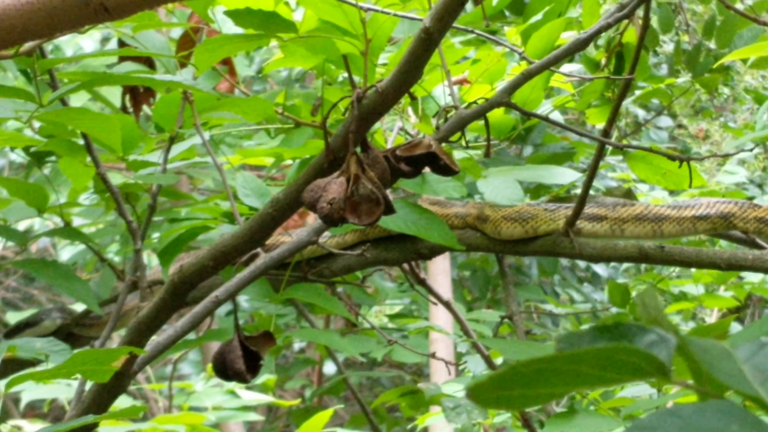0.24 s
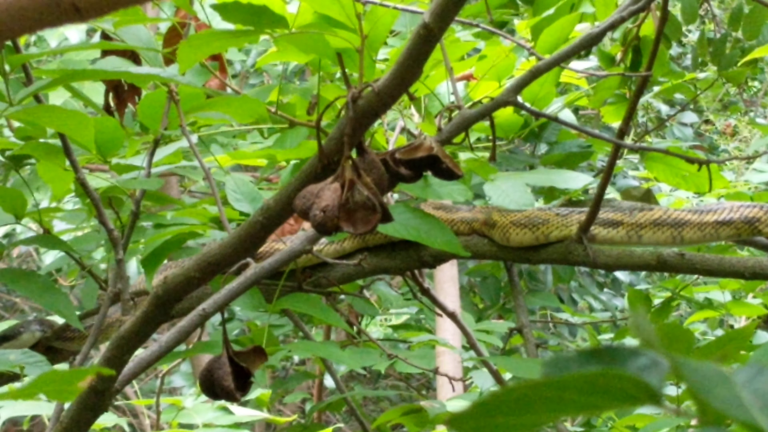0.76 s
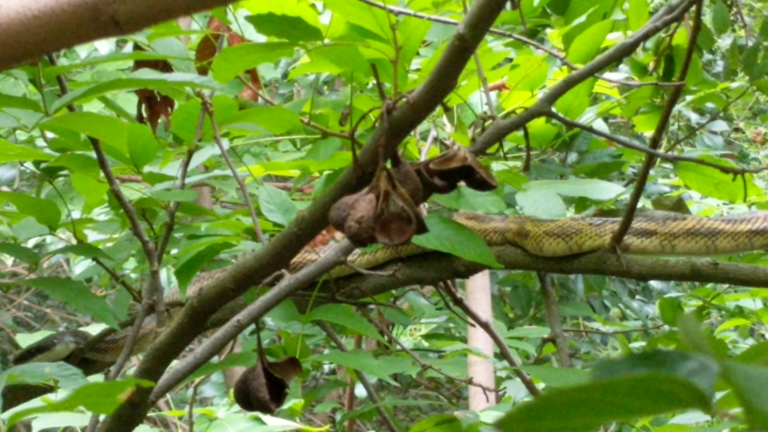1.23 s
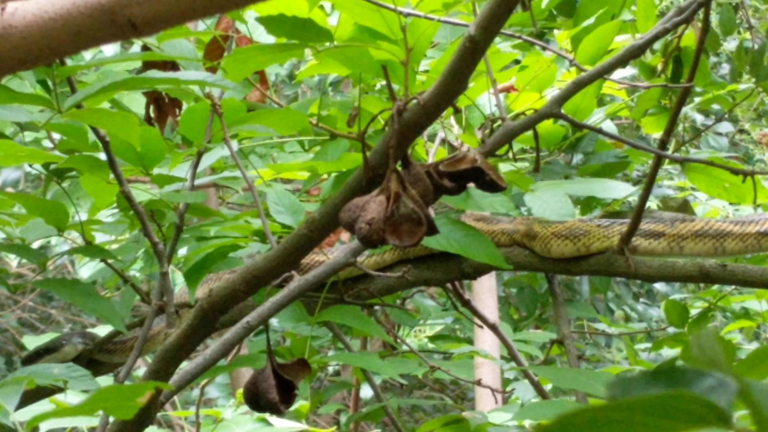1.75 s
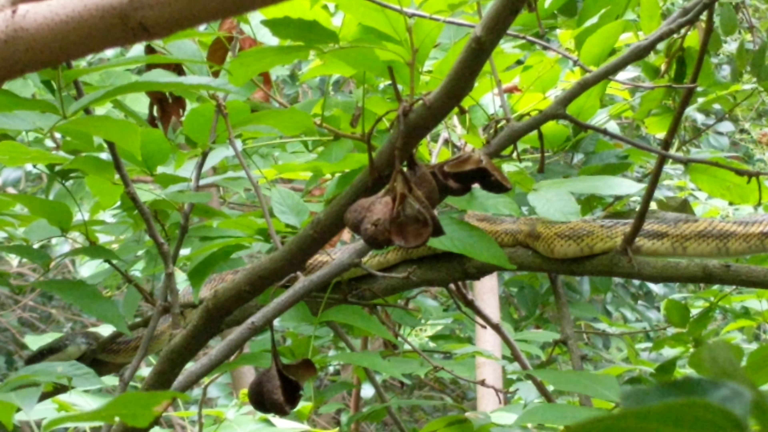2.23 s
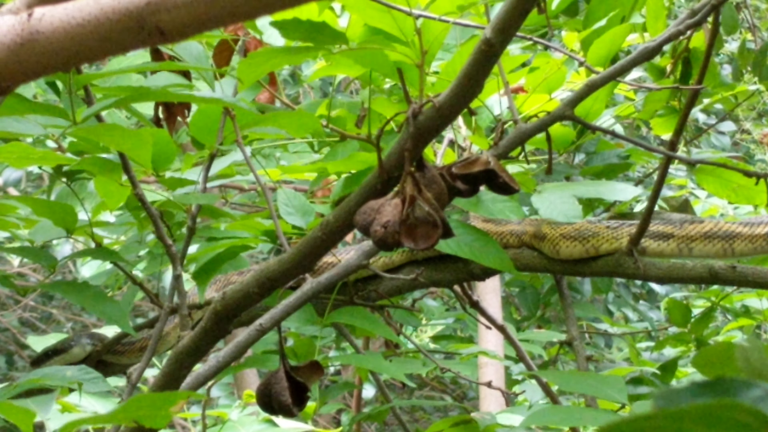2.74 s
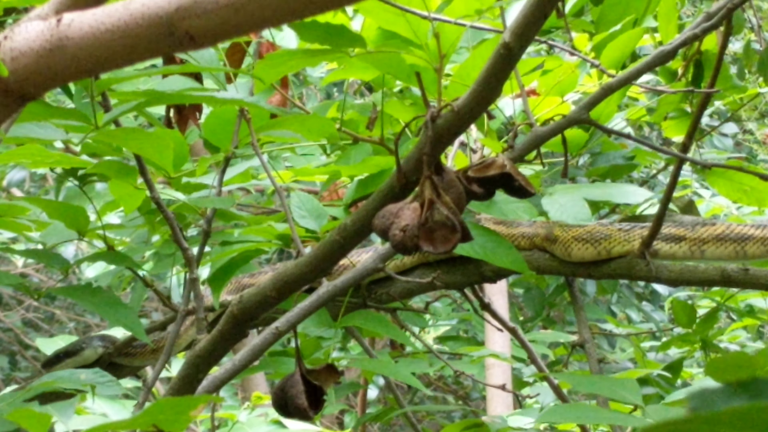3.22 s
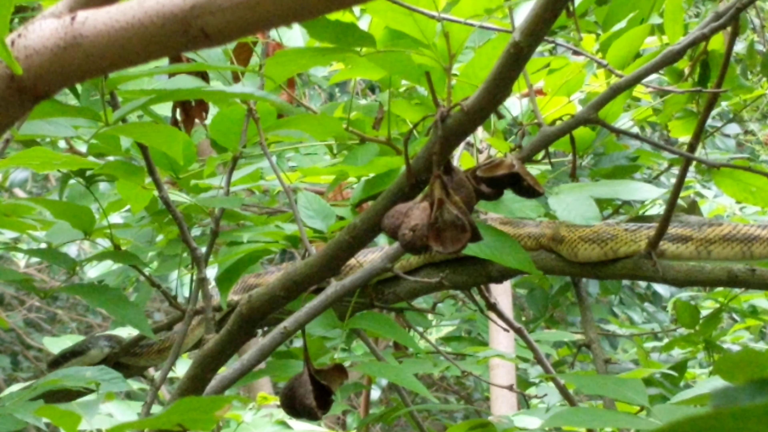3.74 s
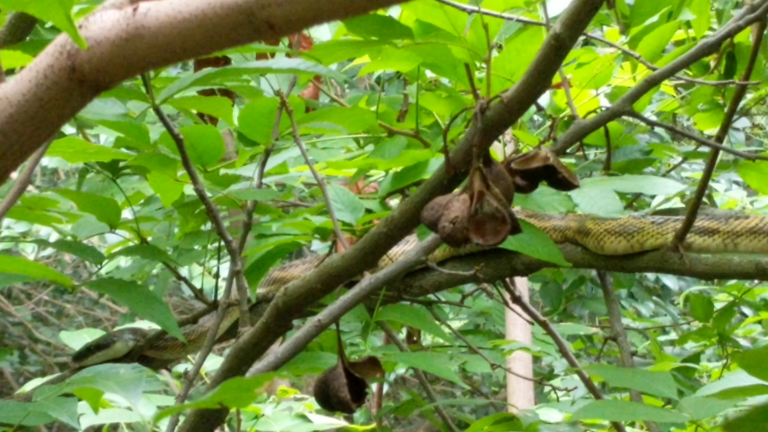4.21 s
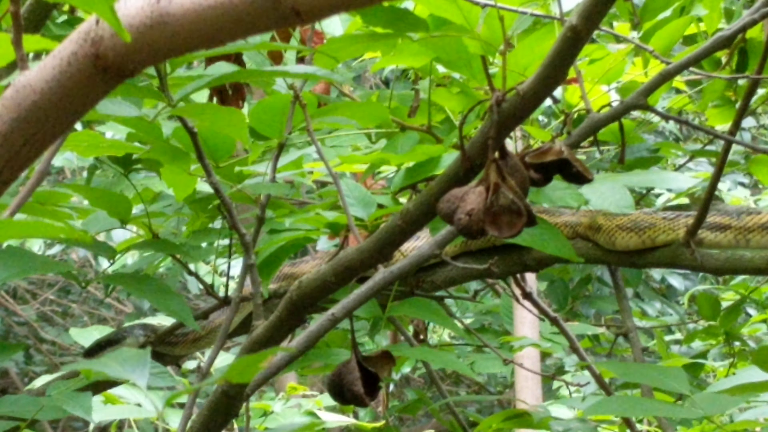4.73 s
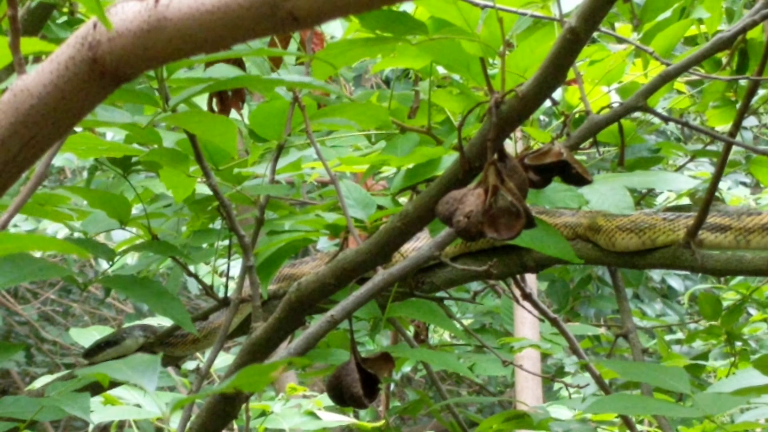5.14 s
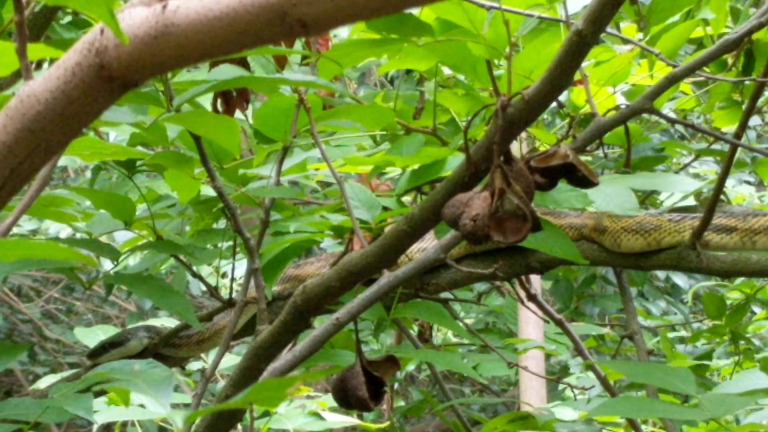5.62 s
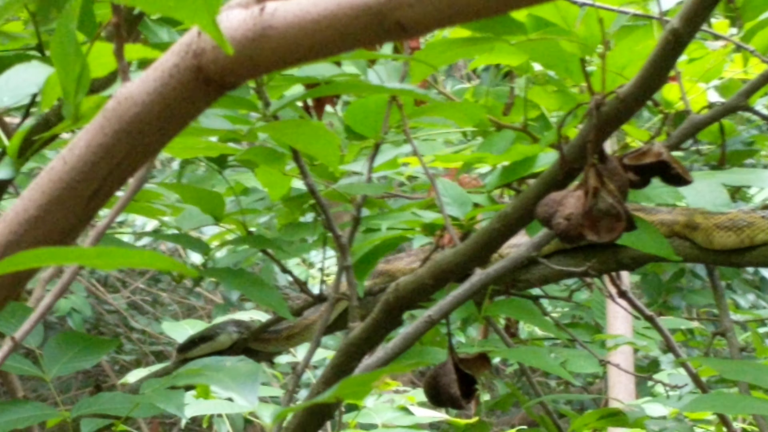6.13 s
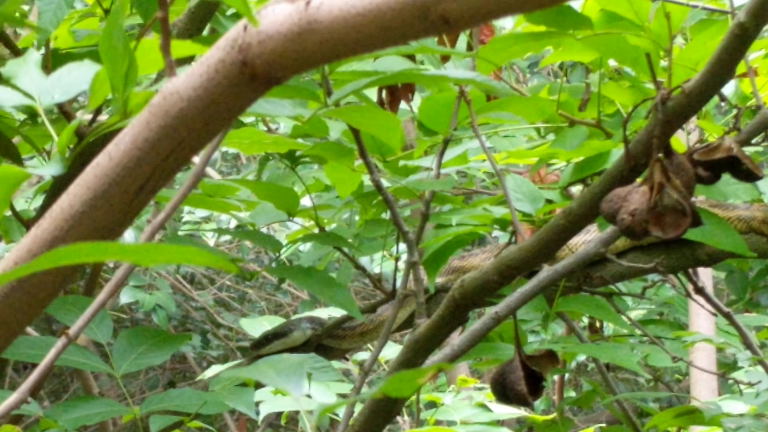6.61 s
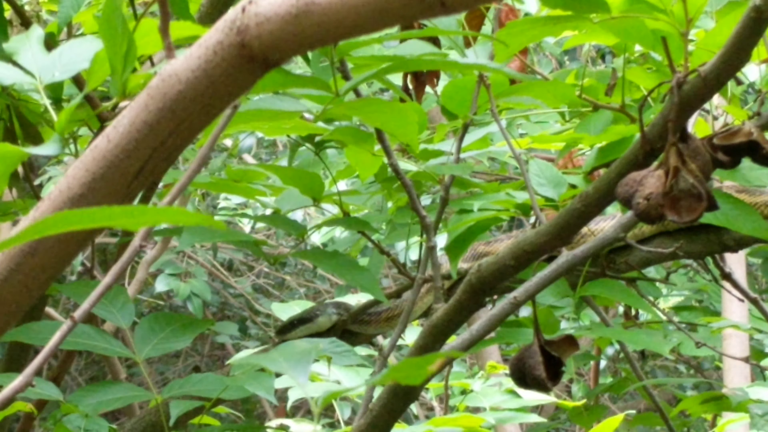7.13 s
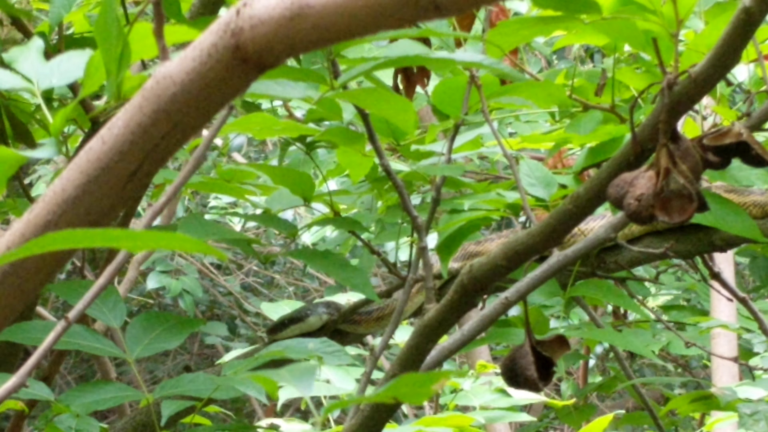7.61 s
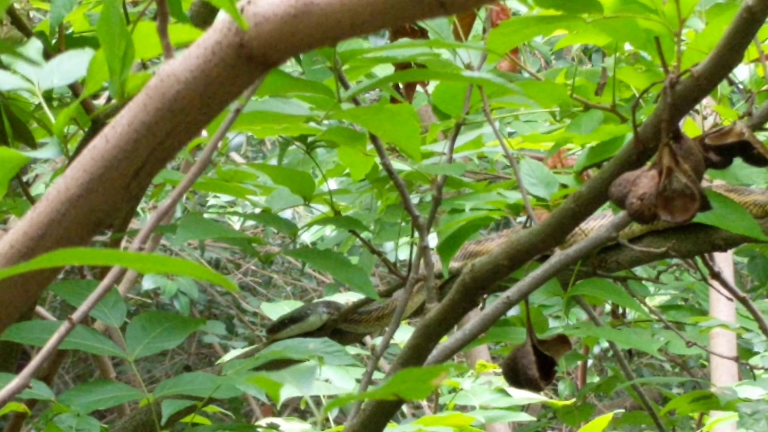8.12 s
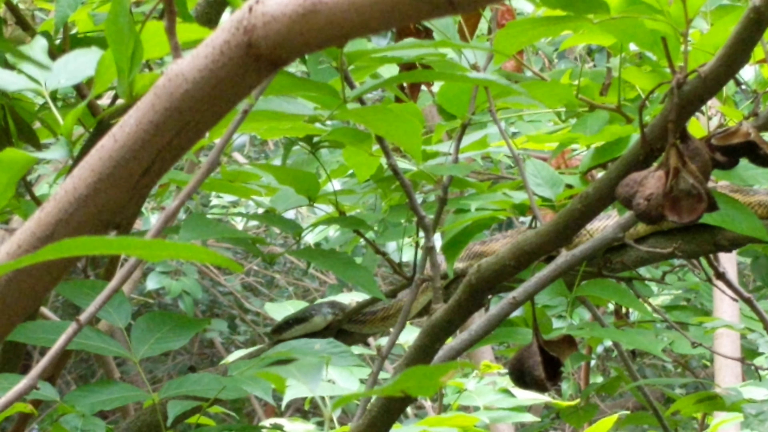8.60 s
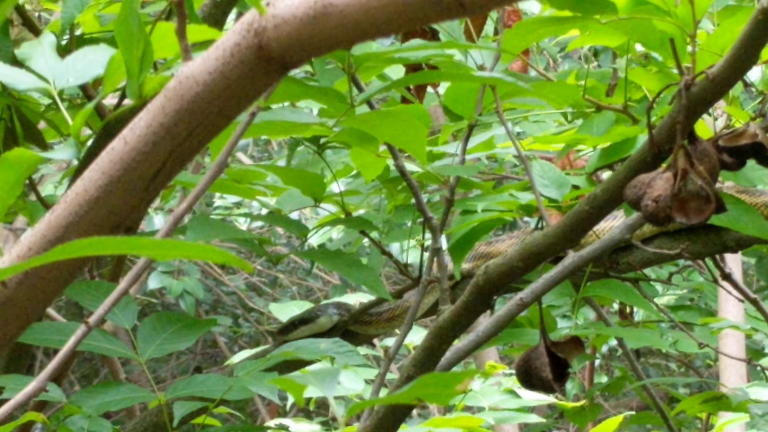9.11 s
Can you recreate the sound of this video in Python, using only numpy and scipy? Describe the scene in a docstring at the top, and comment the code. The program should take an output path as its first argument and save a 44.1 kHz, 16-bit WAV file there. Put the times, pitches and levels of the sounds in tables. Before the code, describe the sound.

Outdoors in leafy woodland, two blue jays scold. The nearer bird gives four bright, rasping screams, three early and one late; the farther one jeers repeatedly, softer and more echoing. Calls crowd together and overlap at first, space out, pause around six seconds, then resume. Each scoops up quickly, slides down and breaks up hoarsely. Behind them are a soft distant rumble, faint leaf hiss and slight hum.

```python
"""Two jays scolding in the woods

Two blue jays scold a snake in leafy woodland, one near and one farther off, and some calls overlap.
Each call is a whistle plus a rasping stack of overtones and noise: its pitch scoops up, then slides down,
and it is harsh at the start and again at the end, where the voice breaks up.
Branches and trees add echoes. Behind the birds are a distant rumble, a faint leaf hiss and a faint hum."""
import sys
import numpy as np
from scipy import signal
from scipy.fft import rfft, irfft, next_fast_len
from scipy.io import wavfile
from scipy.ndimage import uniform_filter1d

SR = 44100
rng = np.random.default_rng(int(sys.argv[2]) if len(sys.argv) > 2 else 0)


def master(y):
    """Save y as 16-bit WAV."""
    cut = np.clip(np.atleast_2d(y).T, -1, 1)
    pcm = np.round(cut * 32767)  # scale
    wavfile.write(sys.argv[1], SR, pcm.astype(np.int16))


N = 412776  # length of the scene [samples]

# The near jay's screams: (start [s], length [s], top pitch [Hz], low pitch [Hz], slide time [s],
#   slide steepness [exponent], whistle peak [dB], time of that peak [s], opening rasp [dB], full rasp [dB],
#   brightness [dB per octave], roughness before harshness is applied [0-1],
#   length of the harsh end [s], downward beak sweep [Hz per closing time])
NEAR_CALLS = [ (-0.11, 0.405, 1516, 1276, 0.195, 2.9, -21, 0.097, -27, -27.5, 6, 0.14, 0.067, 1300),
              (0.644, 0.4, 1534, 1282, 0.2, 2.5, -30, 0.13, -24, -24, 2.5, 0.07, 0.04, 2960),
              (2.492, 0.402, 1532, 1245, 0.255, 2, -23.5, 0.11, -22.5, -23.5, 1.5, 0.03, 0.037, 4180),
              (7.225, 0.43, 1547, 1395, 0.17, 9.2, -26, 0.23, -38, -32, 1, 0.16, 0.075, 2620), ]

# The far jay's jeers, before the bird is mixed lower: (start [s], length [s], top pitch [Hz],
#   low pitch [Hz], slide time [s], high whistle [dB], low whistle [dB], opening rasp [dB], full rasp [dB],
#   brightness [dB per octave], crack in the slide [0-1], late roughness before harshness is applied [0-1],
#   late half-pitch overtones [dB], length of the break-up [s])
FAR_CALLS = [ (0.312, 0.41, 1506, 1205, 0.13, -30, -34.5, -31.5, -29, 0.5, 0.4, 0.27, -5, 0.125),
             (0.925, 0.42, 1533, 1190, 0.14, -31.5, -36, -29, -30, 0, 0.6, 0.06, -7, 0.085),
             (2.165, 0.42, 1483, 1149, 0.13, -29.5, -35.5, -27.5, -31, 1, 0.9, 0.06, -4, 0.085),
             (2.888, 0.44, 1511, 1175, 0.139, -28, -35, -31, -30, 0, 0.5, 0.14, -14, 0.1),
             (3.488, 0.4, 1507, 1207, 0.14, -28, -34, -31, -29.5, 1, 0.54, 0.06, -6, 0.071),
             (4.174, 0.39, 1503, 1168, 0.13, -27.5, -39.5, -30, -31, 0.5, 0.7, 0.16, -13, 0.1),
             (5.012, 0.38, 1510, 1170, 0.12, -26, -43, -31.5, -32, 0.5, 0.3, 0.16, -13, 0.098),
             (6.836, 0.46, 1486, 1179, 0.126, -27.5, -44, -33.5, -31, 0, 0.3, 0.09, -6, 0.065),
             (7.462, 0.41, 1506, 1202, 0.208, -26, -38, -29, -30.5, -0.5, 0.4, 0, -2, 0.089),
             (8.156, 0.45, 1530, 1200, 0.14, -28.5, -37.5, -31, -31, 0, 0.35, 0.06, -8, 0.12),
             (8.824, 0.43, 1503, 1186, 0.13, -29, -40, -33, -31, 0, 0.27, 0.2, -8, 0.11), ]

# Relative colour of each bird's throat and open beak: (frequency [Hz], level [dB])
NEAR_THROAT = [(1200, -3.5), (1900, -23), (2400, -9), (3400, -8.5), (4000, -7), (4600, -1.5), (5500, 1),
               (6200, -1), (7000, -5), (8000, -12.5), (9100, -9.5), (11000, -21.5), (13000, -23.5),
               (15500, -38)]
FAR_THROAT = [(1200, -4), (1900, -9), (2400, -5), (3200, 1), (3800, 0.5), (4600, 3), (5400, -7.5),
              (6200, 2.5), (7000, -1), (8000, -5.5), (9200, -10.5), (11000, -14), (13000, -18.5),
              (15500, -35)]

# Overtones of the squeak that opens a call, relative: (multiple of its pitch [count], level [dB])
SQUEAK_OVERTONES = [(2, -8.5), (3, -4.5), (4, 6), (5, 0), (6, -4), (7, -44)]

# How long the trees' echoes ring: (frequency [Hz], time to fall 60 dB [s])
WOOD_RING = [(1500, 0.72), (3000, 0.58), (6000, 0.59), (10000, 0.5), (15000, 0.035)]

# Relative colour of distant rumble and foliage: (frequency [Hz], level [dB per Hz])
AIR_COLOUR = [(20, -48), (30, -35), (40, -16), (65, -6.5), (100, -2), (200, -4), (450, -12.5), (550, -9.5),
              (1200, -12.5), (3000, -25.5), (4800, -31.5), (5500, -26), (6300, -31.5), (9000, -38.5),
              (15700, -43)]

# Background levels: random unevenness of the low rumble, and a mid wash that fades slightly.
# Only the changes around each mean are used, and the wash's are scaled later:
#   (time [s], low rumble [dB], mid wash [dB])
AIR_LEVELS = [(0.1, -52.5, -50.5), (0.15, -56, -51), (0.56, -51.5, -50.5), (9.15, -50.5, -54),
              (9.25, -55.5, -53.5)]

# Resonance that takes over as each beak closes: final pitch [Hz], width [Hz], height [dB], closing time [s]
NEAR_CLOSING = (3130, 580, 9.4, 0.19)
FAR_CLOSING = (2930, 280, 6.9, 0.22)
FAR_SWEEP_HZ = 710  # downward sweep of the far beak's resonance per closing time

# Both birds
SCOOP, SCOOP_S = 0.23, 0.019  # a call starts this fraction below its pitch, and catches up
RELEASE_S = 0.0444  # the breath runs out over the last moments of a call
SQUEAK_HZ = 1117

# The near jay's scream
SCREAM_OPENING_S = 0.048
SCREAM_LULL_DB, SCREAM_SWELL_S = -5.5, 0.28
WHISTLE_RISE_DB, WHISTLE_RISE_S = -8, 0.038  # below the peak, before the peak
WHISTLE_FADE_DB_PER_S = -47  # after the peak
SCREAM_SAG_HZ, SCREAM_SAG_S = 199.4, 0.04  # the pitch sags as the breath runs out
SCREAM_DULLING_DB_PER_S = -5  # change of brightness (dB per octave) each second
SCREAM_HALF_DB, SCREAM_OPENING_HALF_DB = -4, 4  # half-pitch overtones

# The far jay's jeer
JEER_OPENING_S, JEER_WHISTLE_IN_S = 0.029, 0.017
JEER_LULL_DB, JEER_SWELL_S = -8, 0.3
JEER_STEEPNESS = 4.3  # how abruptly the slide sets in
JEER_ROUGH, CRACK_S = 0.33, 0.025  # early roughness before harshness is applied; width of the crack
JEER_END_LIFT_HZ = 49.7  # the pitch lifts as the voice breaks up
JEER_HIGH_HALF_DB, JEER_SLIDE_HALF_DB, JEER_DOUBLED_HALF_DB = -0.5, -6, 9  # half-pitch overtones

# Background
AIR_DB = -46
HUM_HZ, HUM_DB, HUM_THIRD_DB = 183, -58.5, -6  # third harmonic is relative to the hum's fundamental
EDGE_HZ = 15750  # upper edge of the sound


def scream(row, catch_db=-7, catch_s=0.018, release_db=-11, whistle_release_db=-12, rough_s=0.039,
           breakup_takes_s=0.04):
    """The near jay's controls: the whistle peaks and fades while the clear stack of overtones swells."""
    (*pitch, whistle_db, peak_s, opening_db, full_db,
     tilt_db, rough, breakup_s, sweep_hz) = row
    t, age, left, slid, hz = glide(*pitch)
    hz = hz - SCREAM_SAG_HZ * np.exp(-left / SCREAM_SAG_S)
    opening = np.exp(-(age / SCREAM_OPENING_S) ** 4)
    release = np.clip(1 - left / RELEASE_S, 0, 1)
    breakup = ease(.5 + (breakup_s - left) / breakup_takes_s)

    whistle = whistle_db + WHISTLE_RISE_DB * ease((peak_s - age) / WHISTLE_RISE_S)
    whistle += WHISTLE_FADE_DB_PER_S * np.maximum(age - peak_s, 0)
    whistle += whistle_release_db * breakup

    swelling_db = full_db + SCREAM_LULL_DB * (1 - ease(age / SCREAM_SWELL_S))
    rasp = blend(swelling_db, opening_db, opening)
    rasp += catch_db * bump(age, catch_s) + release_db * release

    tilt = tilt_db + SCREAM_DULLING_DB_PER_S * (age - left) / 2
    rough = blend(rough, 1, np.maximum(bump(age, rough_s), breakup))
    half = blend(SCREAM_HALF_DB, SCREAM_OPENING_HALF_DB, opening)
    return t, hz, whistle, rasp, tilt, rough, half, (*NEAR_CLOSING, sweep_hz)


def jeering(row, whistle_out_db=-9, release_db=-19, opening_tilt_db=2, whistle_in_db=-24,
            breakup_takes_s=0.032, collapse_s=0.058):
    """The far jay's controls: the whistle gives way to rasp as the pitch slides, then the voice breaks up."""
    (*pitch, high_db, low_db, opening_db, full_db, tilt_db,
     crack, late_rough, late_half_db, breakup_s) = row
    t, age, left, slid, hz = glide(*pitch, JEER_STEEPNESS)
    opening = np.exp(-(age / JEER_OPENING_S) ** 4)
    swell = ease(age / JEER_SWELL_S)
    # the half-pitch overtones first grow strong, then the rasp turns to noise
    doubling = ease(.5 + (breakup_s - left) / breakup_takes_s)
    collapse = ease((breakup_s - left) / collapse_s)
    fade_db = release_db * np.clip(1 - left / RELEASE_S, 0, 1)

    whistle = blend(high_db, low_db, slid) + whistle_in_db * np.exp(-age / JEER_WHISTLE_IN_S)
    whistle += whistle_out_db * doubling + fade_db
    rasp = blend(full_db + JEER_LULL_DB * (1 - swell), opening_db, opening) + fade_db

    slide_s = pitch[-1]
    cracking = crack * bump(age - slide_s + CRACK_S / 2, CRACK_S)
    strain = np.max([opening, cracking, (doubling + collapse) / 2], axis=0)
    rough = blend(blend(JEER_ROUGH, late_rough, swell ** 4), 1, strain)

    half = blend(JEER_HIGH_HALF_DB, late_half_db, swell) + JEER_SLIDE_HALF_DB * np.sin(np.pi * slid)
    half = blend(half, JEER_DOUBLED_HALF_DB, doubling) * (1 - collapse)
    tilt = tilt_db + opening_tilt_db * opening
    hz = hz + JEER_END_LIFT_HZ * doubling
    return t, hz, whistle, rasp, tilt, rough, half, (*FAR_CLOSING, FAR_SWEEP_HZ)


def bird(calls, course, throat, **voice):
    """All the calls of one jay, each following that bird's course."""
    out = np.zeros(N)
    for row in calls:
        start_s, sound = call(course(row), throat, **voice)
        add(out, start_s, sound)
    return out


def glide(start, length, top_hz, low_hz, slide_s, steepness, scoop_shape=1.51):
    """Time, age, time left, progress of the slide and pitch: a quick scoop up, then a slide down."""
    t = np.arange(max(start, 0), start + length, 1 / SR)
    age = t - start
    slid = 1 - 1 / (1 + (age / slide_s) ** steepness)
    scoop = 1 - SCOOP * np.exp(-(age / SCOOP_S) ** scoop_shape)
    return t, age, length - age, slid, blend(top_hz, low_hz, slid) * scoop


def call(controls, throat, harsh, jitter, blur, flutter, low_db, squeak_share, attack_s, hoarse_db,
         squeak_s=0.0087):
    """One call: the voice organ swings in alternate strong and weak cycles and turns noisy when pushed."""
    t, hz, whistle_db, rasp_db, tilt_db, rough, half_db, closing = controls
    size, age = len(t), t - t[0]
    rough = np.clip(harsh * np.clip(rough, 0, 1) ** 0.84, .005, .97)
    # the pitch trembles, more so in the rough stretches
    tremble = jitter * (0.42 + rough) * wander(size, 450) + 0.0029 * wander(size, 43.0)
    phase = 2 * np.pi * np.cumsum(hz * (1 + tremble)) / SR

    # the second harmonic is the whistle; the fundamental and the line between them leak out weakly
    unsteady = evened(1 + flutter * np.sqrt(rough) * wander(size, 135))
    whistle = np.sqrt(2) * np.sin(2 * phase) * unsteady
    low_gain = gain_of(low_db + 0.42 * whistle_db + 0.22 * rasp_db)
    low = low_gain * (np.sin(phase) + 1.1 * gain_of(half_db) * np.sin(3 * phase / 2))

    # in a hoarse voice the top of the range is more noise than tone
    throat_hz, throat_db = np.transpose(throat)
    husk_db = hoarse_db * np.clip(np.log2(throat_hz / 6000), 0, 1)
    noisy = np.c_[throat_hz, throat_db + husk_db]
    tonal = np.c_[throat_hz, throat_db - husk_db]

    # noise comes in puffs, one every other cycle, and in an uneven rattle
    puff_shape = 1 + 0.62 * np.cos(phase / 2)
    rattle = 1 + 0.5 * wander(size, 200)
    puffs = evened(hiss(noisy, t, tilt_db, closing) * puff_shape * rattle)
    lines = overtones(tonal, t, hz, phase, tilt_db, half_db, closing, blur)
    rasp = np.sqrt(1 - rough) * lines + np.sqrt(rough) * puffs

    # the opening squeak gives way to the full voice
    opening = np.clip(squeak_share, 0, 1) * np.exp(-(age / squeak_s) ** 4)
    rasp = np.sqrt(1 - opening) * rasp + 1.55 * np.sqrt(opening) * squeak(size)

    voice = gain_of(rasp_db) * rasp + gain_of(whistle_db) * whistle + low
    fade_in = np.clip(age / attack_s, 0, 1)
    fade_out = np.clip((t[-1] - t) / 0.0067, 0, 1)
    return t[0], voice * fade_in * fade_out


def overtones(throat, t, hz, phase, tilt_db, half_db, closing, blur, shimmer_db=3.0):
    """Lines at every half step of the pitch; uneven cycles make the odd ones, the highest blur into hiss."""
    size = len(t)
    stack, power = np.zeros(size), np.zeros(size)
    for k in range(5, 25):
        line_hz = k * hz / 2
        db = read(throat, line_hz) + beak(line_hz, t[-1] - t, tilt_db, closing)
        db = db + (k % 2) * half_db
        height = gain_of(db + shimmer_db * wander(size, 16.4))
        line_phase = k * (phase / 2 + blur * wander(size, 160)) + 2 * np.pi * rng.random()
        stack += height * np.sin(line_phase)
        power += height ** 2 / 2
    return stack / np.sqrt(power)


def hiss(throat, t, tilt_db, closing):
    """Noise from turbulent breath, coloured by throat and beak."""
    hz, at, z = signal.stft(rng.standard_normal(len(t)), SR, nperseg=256)
    hz, at = hz[:, None], t[0] + at
    beak_db = beak(hz, t[-1] - at, np.interp(at, t, tilt_db), closing)
    colour = gain_of(read(throat, hz) + beak_db)
    low_cut = 1 / (1 + (1400 / (hz + 1)) ** 6)
    return evened(signal.istft(z * colour * low_cut, SR, nperseg=256)[1][:len(t)])


def squeak(size, jitter=0.024):
    """The thin, unsteady note of membranes that have just caught."""
    phase = 2 * np.pi * np.cumsum(SQUEAK_HZ * (1 + jitter * wander(size, 300))) / SR
    note = np.zeros(size)
    for k, db in SQUEAK_OVERTONES:
        note += gain_of(db) * np.sin(round(k) * phase + 2 * np.pi * rng.random())
    return evened(note)


def beak(hz, left_s, tilt_db, closing, centre_hz=5500):
    """Gain in dB of the beak: a tilt by its opening, and a resonance that sweeps down as it closes."""
    final_hz, width_hz, height_db, closing_s, sweep_hz = closing
    shut = np.exp(-(left_s / closing_s) ** 4)
    peak_hz = final_hz + sweep_hz * left_s / closing_s
    ring_db = height_db * shut / (1 + ((hz - peak_hz) / width_hz) ** 2)
    return tilt_db * np.clip(np.log2((hz + 1) / centre_hz), -1, 1) + ring_db


def woodland(x, branches_db, trees_db, spread, count=14):
    """The direct sound, quick echoes off nearby branches, and a diffuse tail from the trees."""
    t = np.arange(SR) / SR
    branches = np.zeros(SR)
    delay = rng.uniform(.001, spread, count)  # seconds
    branches[(delay * SR).astype(int)] = rng.choice([-1, 1], count) * np.exp(-delay / spread)

    # the tail is noise that dies away at its own speed in each band
    noise = rng.standard_normal(SR) * np.clip(t / 0.019, 0, 1)
    hz, at, z = signal.stft(noise, SR, nperseg=256)
    decay = gain_of(-60 * at / read(WOOD_RING, hz)[:, None])
    tail = signal.istft(z * decay, SR, nperseg=256)[1][:SR]

    echoes = gain_of(branches_db) * branches / np.linalg.norm(branches)
    echoes += gain_of(trees_db) * tail / np.linalg.norm(tail)
    return x + signal.fftconvolve(x, echoes)[:N]


def air(patchy_db=0.5, wash_hz=1300, wash_scale=1.75):
    """Coloured noise in soft patches: uneven rumble, slightly fading wash, leaf hiss; plus a wavering hum."""
    hz, at, z = signal.stft(rng.standard_normal(N), SR, nperseg=4096, noverlap=3072)
    patches = uniform_filter1d(rng.standard_normal(z.shape), size=24, axis=0)
    patches = evened(uniform_filter1d(patches, size=8, axis=1))

    s, *levels = np.transpose(AIR_LEVELS)
    rumble_db, wash_db = (np.interp(at, s, db - db.mean()) for db in levels)
    hz = hz[:, None]
    level_db = rumble_db / (1 + (hz / 150) ** 4)
    level_db = level_db + wash_scale * wash_db * np.exp(-2 * np.log((hz + 1) / wash_hz) ** 2)
    z = z * gain_of(read(AIR_COLOUR, hz) + level_db + patchy_db * patches)
    wash = evened(signal.istft(z, SR, nperseg=4096, noverlap=3072)[1][:N])

    phase = 2 * np.pi * np.cumsum(HUM_HZ + 4 * wander(N, 6.05)) / SR
    hum = np.sin(phase) + gain_of(HUM_THIRD_DB) * np.sin(3 * phase)
    hum = hum * (1 + .5 * wander(N, 3.2))
    return gain_of(AIR_DB) * wash + gain_of(HUM_DB) * evened(hum)


def gain_of(db):
    """Decibels to amplitude."""
    return 10 ** (np.asarray(db) / 20)


def evened(x):
    """Scales to an average strength (rms) of 1."""
    return x / np.sqrt(np.mean(x ** 2) + 1e-20)


def read(points, hz):
    """Reads a table of values by frequency, on a log-frequency axis."""
    f, value = np.transpose(points)
    return np.interp(np.log(hz + 1), np.log(f + 1), value)


def add(mix, s, sound):
    """Adds a sound into the mix at time s, in seconds."""
    part = mix[max(round(s * SR), 0):][:len(sound)]
    part += sound[:len(part)]


def wander(size, hz):
    """Random motion of rms 1, mostly slower than hz."""
    length = next_fast_len(size)
    f = np.fft.rfftfreq(length, 1 / SR)
    slow = rfft(rng.standard_normal(length)) / (1 + (f / hz) ** 4)
    return evened(irfft(slow, length)[:size])


def blend(a, b, share):
    """Goes from a to b as share goes from 0 to 1."""
    return a + (b - a) * share


def bump(t, width_s):
    """A bell of height 1 around t = 0."""
    return np.exp(-(t / width_s) ** 2)


def ease(u):
    """A smooth step from 0 to 1 as u goes from 0 to 1."""
    return np.sin(np.pi / 2 * np.clip(u, 0, 1)) ** 2


def scene():
    """Both jays in the wood over the background, the same in both channels."""
    near = bird(NEAR_CALLS, scream, NEAR_THROAT, low_db=-27.5, squeak_share=0.14, attack_s=0.00099,
                harsh=.7, jitter=.004, blur=.005, flutter=.55, hoarse_db=0)
    far = bird(FAR_CALLS, jeering, FAR_THROAT, low_db=-28.5, squeak_share=0.97, attack_s=0.0039,
               harsh=.75, jitter=.007, blur=.035, flutter=.55, hoarse_db=2.5)
    # the far bird comes with stronger echoes
    near = woodland(near, branches_db=-7, trees_db=-15, spread=.015)
    far = woodland(far, branches_db=0, trees_db=-9.5, spread=.035)
    mix = near + gain_of(-4.5) * far + air()
    return np.array([mix, mix])


def record(dry):
    """Cuts everything above the upper edge with a steep low-pass filter."""
    low_pass = signal.firwin(511, EDGE_HZ, window=("kaiser", 9), fs=SR)
    return signal.oaconvolve(dry, low_pass[None], "same")


dry = scene()
out = record(dry)
master(out)
```